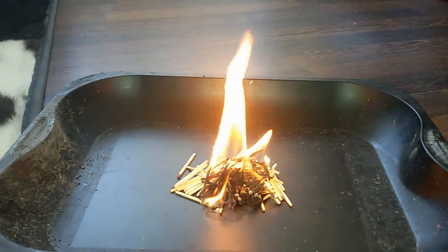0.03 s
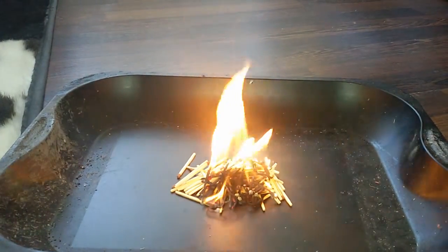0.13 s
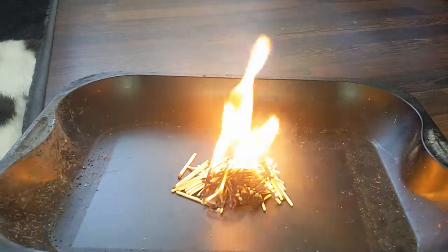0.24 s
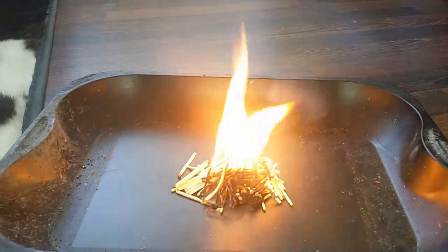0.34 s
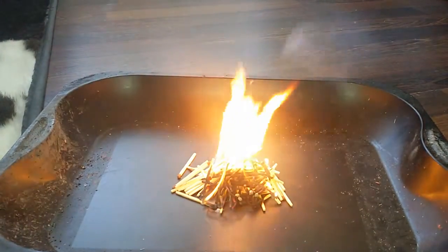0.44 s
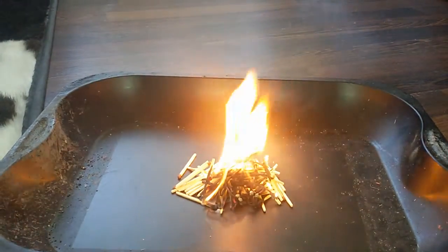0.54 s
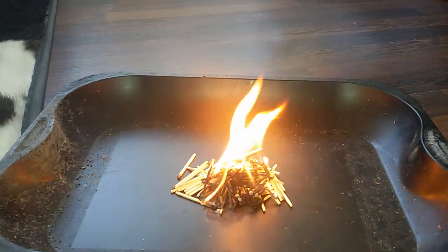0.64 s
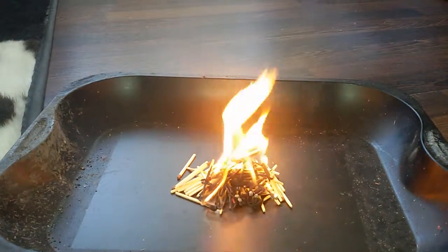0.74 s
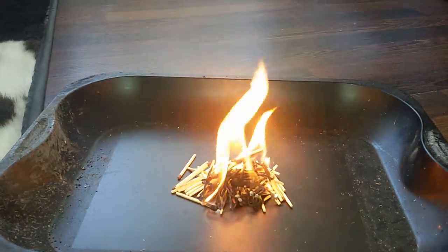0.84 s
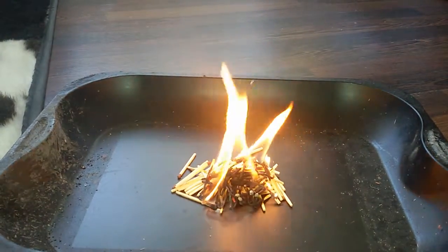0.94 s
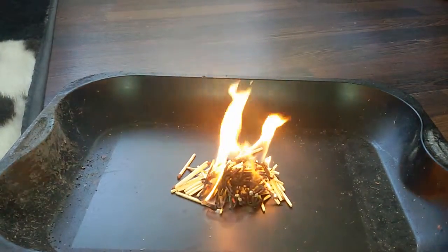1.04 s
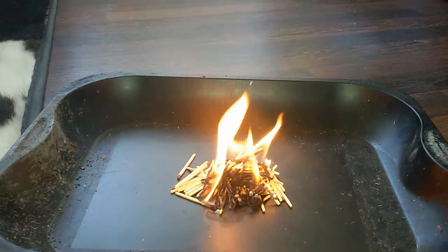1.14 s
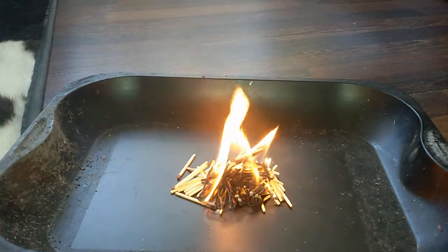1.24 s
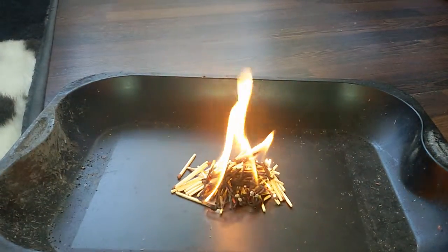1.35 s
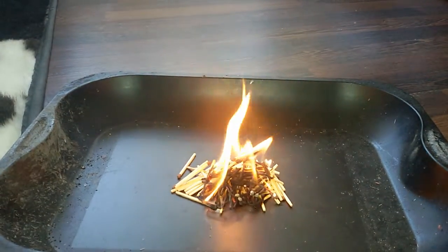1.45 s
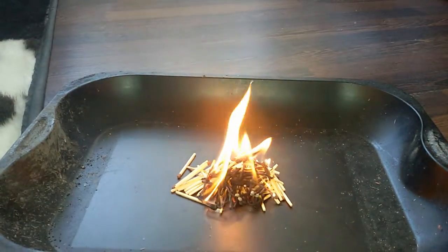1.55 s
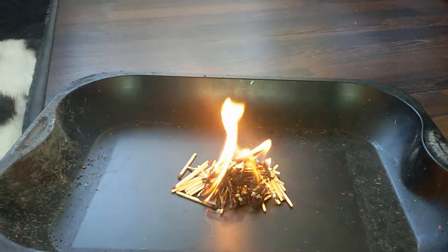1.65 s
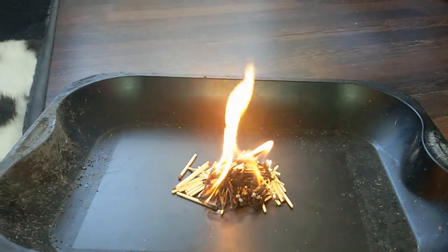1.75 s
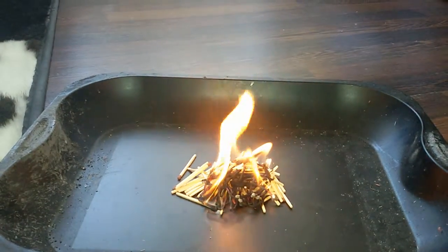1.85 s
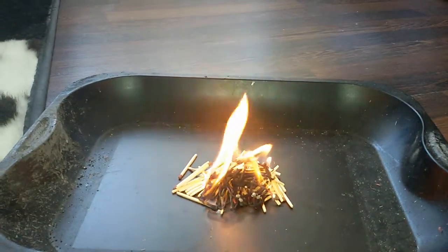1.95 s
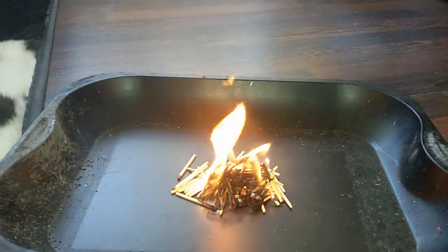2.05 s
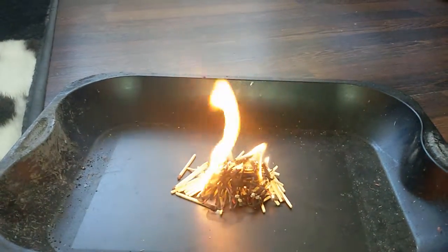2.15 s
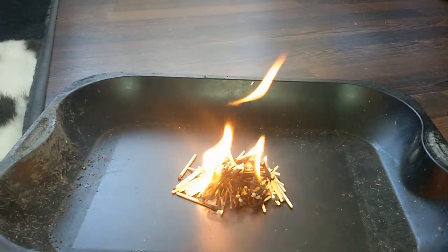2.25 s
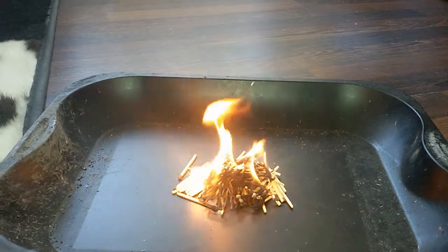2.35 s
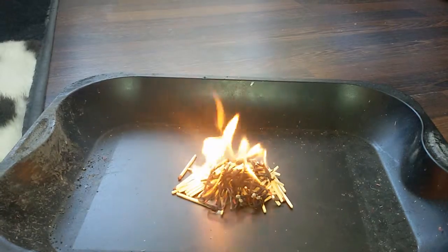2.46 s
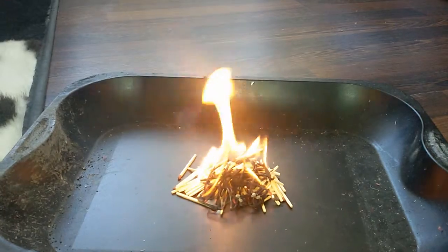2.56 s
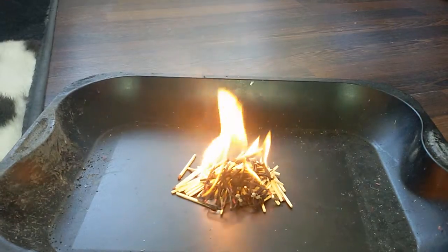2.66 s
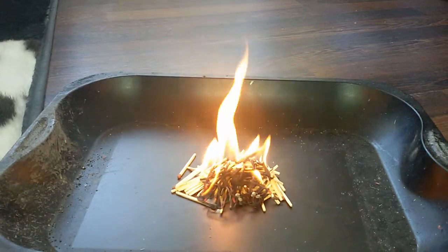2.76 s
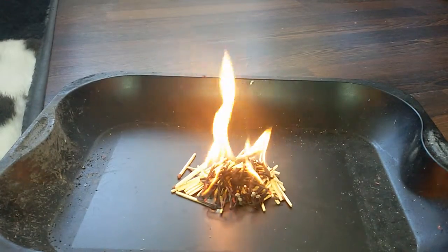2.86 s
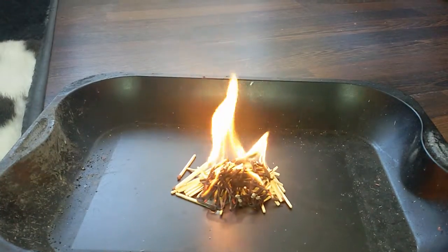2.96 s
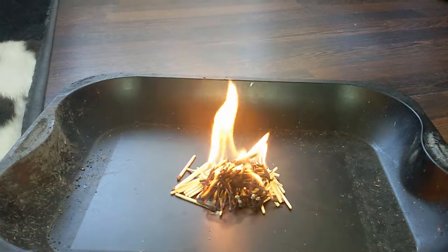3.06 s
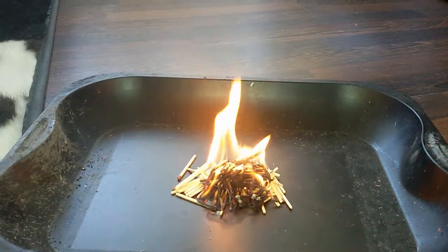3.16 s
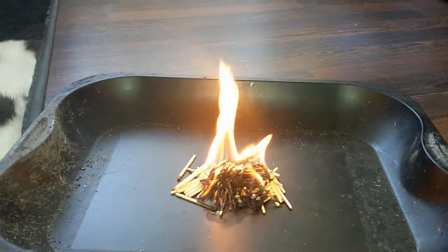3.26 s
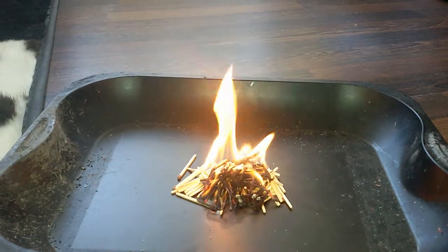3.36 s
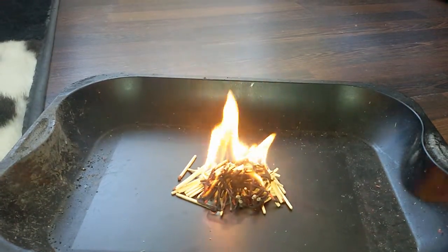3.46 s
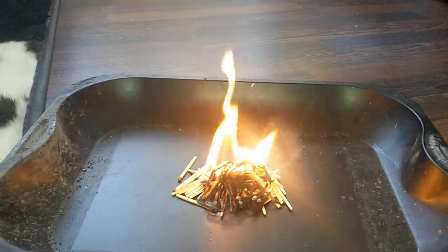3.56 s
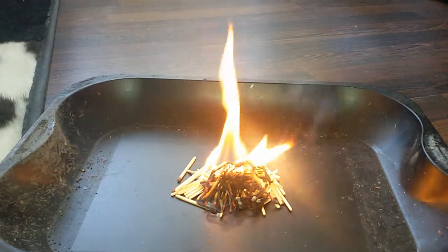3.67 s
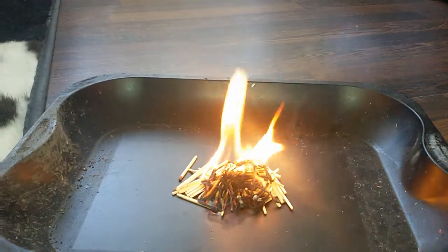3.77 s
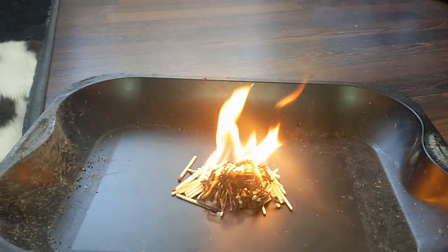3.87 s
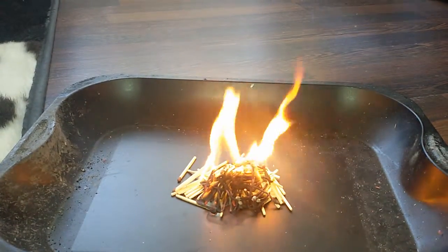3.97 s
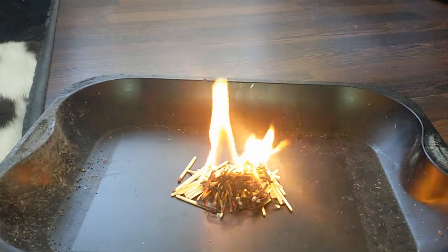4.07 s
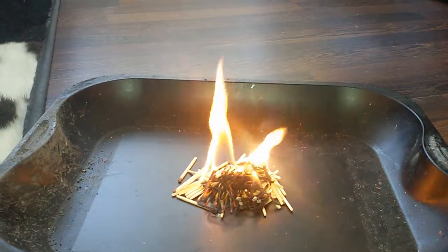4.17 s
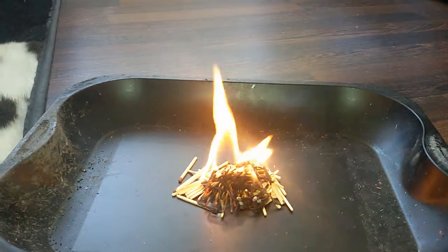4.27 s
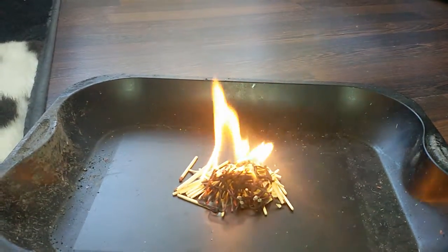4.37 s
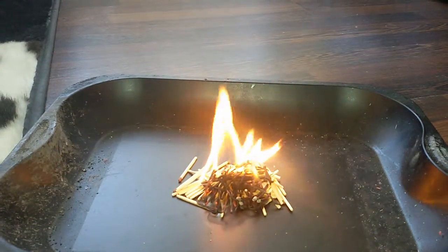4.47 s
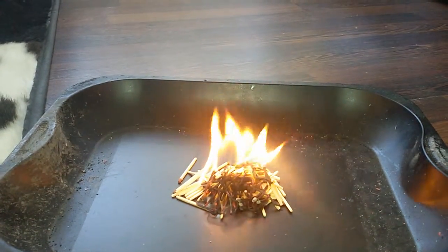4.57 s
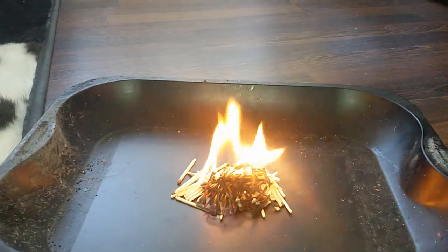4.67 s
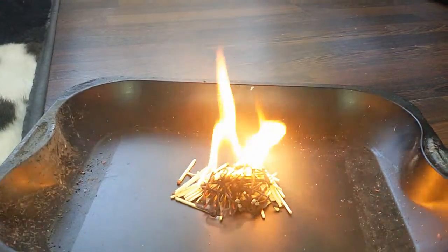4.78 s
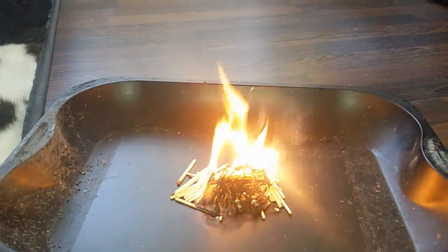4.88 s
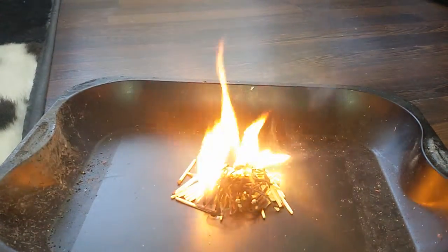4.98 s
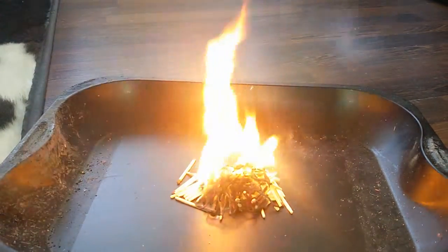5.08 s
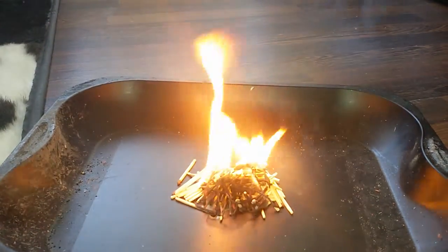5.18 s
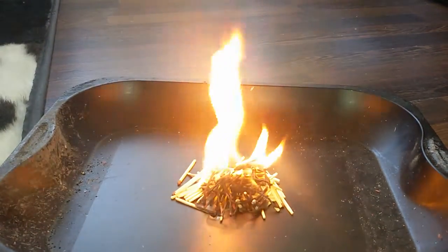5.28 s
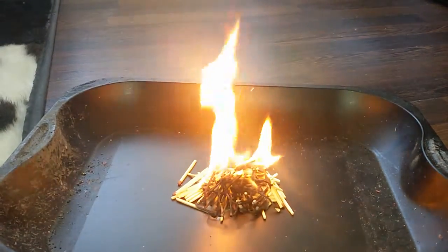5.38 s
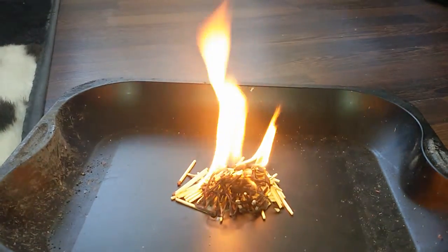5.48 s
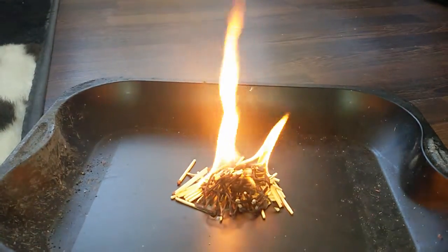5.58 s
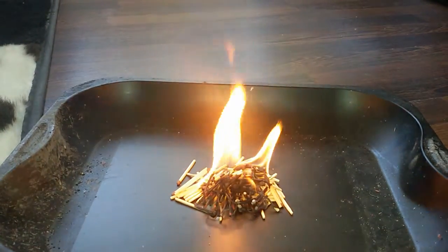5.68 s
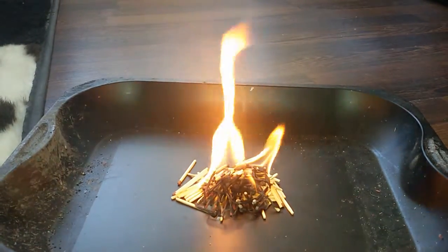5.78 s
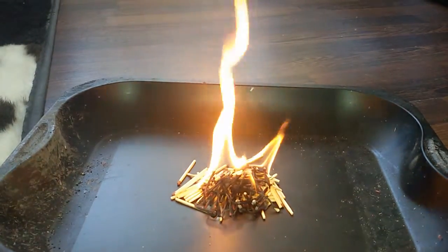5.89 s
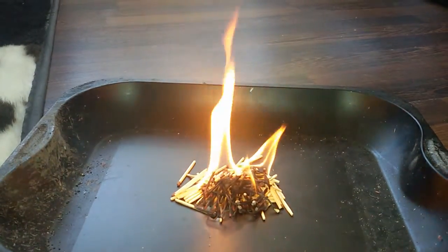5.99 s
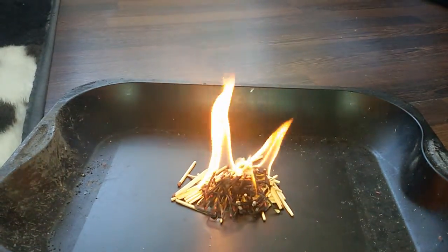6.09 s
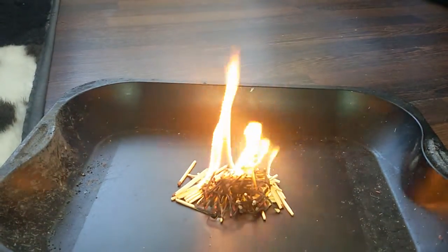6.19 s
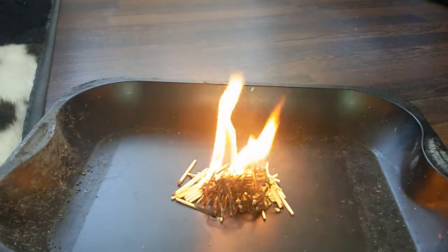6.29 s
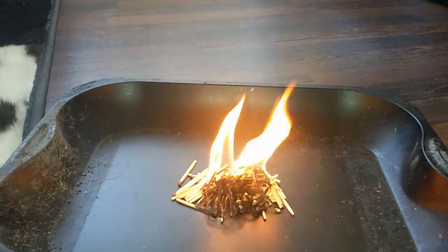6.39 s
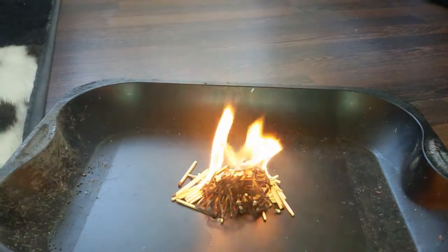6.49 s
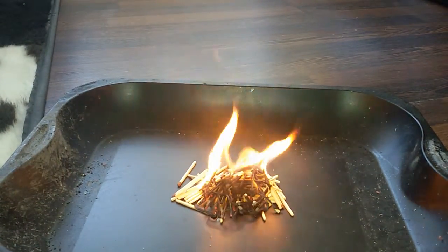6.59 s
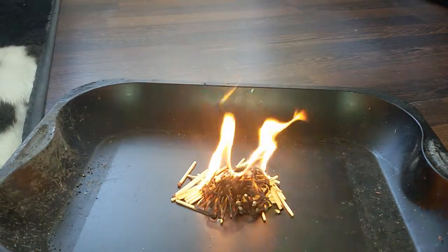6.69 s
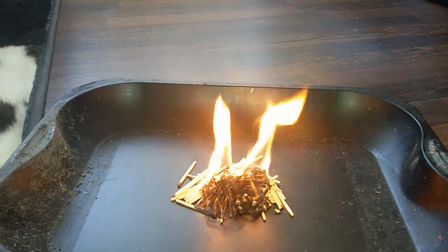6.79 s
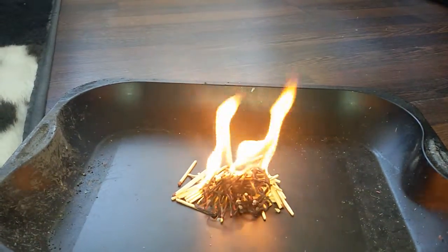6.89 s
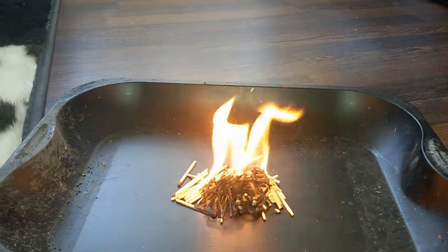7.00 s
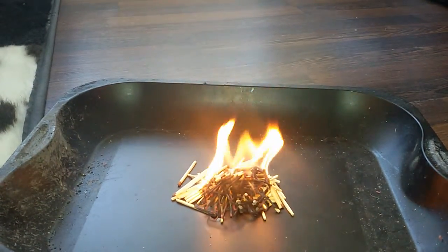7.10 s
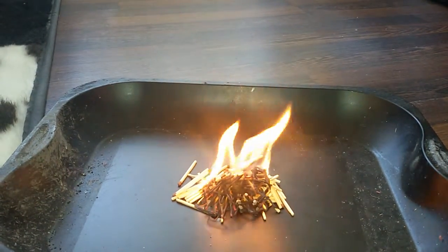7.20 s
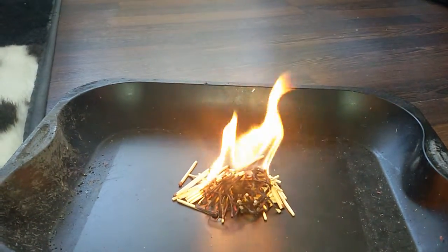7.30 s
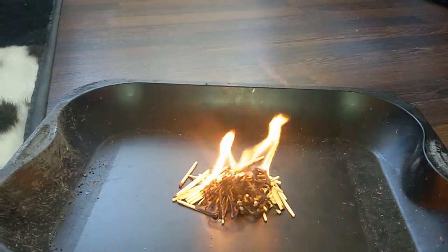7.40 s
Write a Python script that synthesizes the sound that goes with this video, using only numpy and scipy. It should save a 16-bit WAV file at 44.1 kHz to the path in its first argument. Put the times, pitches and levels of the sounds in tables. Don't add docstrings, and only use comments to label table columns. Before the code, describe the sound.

A heap of wooden matches burns in a metal tray, heads flaring in short hissing, crackling bursts with sharp pops between quieter gaps.

```python
import sys
import numpy as np
from scipy import signal
from scipy.fft import rfft, irfft, next_fast_len
from scipy.io import wavfile
from scipy.ndimage import uniform_filter1d, minimum_filter1d, map_coordinates

SR = 44100
rng = np.random.default_rng(int(sys.argv[2]) if len(sys.argv) > 2 else 0)


def transcribe(signal):
    frames = np.atleast_2d(signal).T
    limited = np.clip(frames, -1, 1)
    pcm = np.round(limited * 32767).astype(np.int16)
    wavfile.write(sys.argv[1], SR, pcm)


def magnitude_from_level(level_db):
    exponent = np.asarray(level_db, float) / 20
    return 10 ** exponent


N = 328448


def unit(x):
    return x / np.sqrt(np.mean(x ** 2) + 1e-20)


def along(points, hz):
    f, v = np.transpose(points)
    return np.interp(np.log(hz + 1), np.log(f + 1), v)


def wobble(rate):
    knots = rng.standard_normal(int(N * rate / SR) + 4)
    return map_coordinates(knots, [np.arange(N) * rate / SR])


def filtered(x, response):
    m = next_fast_len(N + SR // 2)
    return irfft(rfft(x, m) * response(np.fft.rfftfreq(m, 1 / SR)), m)[..., :N]


def noise(spectrum):
    return unit(filtered(rng.standard_normal(N), lambda hz: magnitude_from_level(along(spectrum, hz))))


def through(x, modes):
    def shape(f):
        total = 0
        for k, (center, width, db) in enumerate(modes):
            ring = 1j * f * width / (center * center - f * f + 1j * f * width)
            total = total + (-1) ** k * magnitude_from_level(db) * ring
        return total

    gain = np.sqrt(np.mean(np.abs(shape(np.linspace(0, SR / 2, num=2000))) ** 2))
    return filtered(x, shape) / gain


def bursts(rows):
    out, t = np.zeros(N + 2000), np.arange(2000) / SR
    puffs = rng.standard_normal((len(rows), len(t)))
    for (s, db, t60), puff in zip(rows, puffs):
        puff = puff * magnitude_from_level(-60 * t / max(t60, 3e-4))
        puff[0] = 4
        out[round(s * SR):][:len(t)] += magnitude_from_level(db) * puff / np.linalg.norm(puff[:50])
    return out[:N]


def jet(per_second, spread_db, gas, puff_db):
    chance, size, sign = rng.random((3, N))
    grains = (chance < per_second / SR) * magnitude_from_level(spread_db * size ** 3) * np.sign(sign - 0.5)
    puffing = magnitude_from_level(puff_db * np.tanh(0.65 * wobble(110) + 0.5 * wobble(30)))
    return unit(puffing * (unit(grains) + gas * rng.standard_normal(N)))


def room_tone():
    # f/Hz, level/dB per Hz
    quiet = [(12, -43), (20, -3), (103, -1.5), (164, -1.5), (199, -0.5), (421, -12.5), (497, -6.5),
             (818, -11.5), (940, -11), (1080, -13), (1730, -11), (1930, -9.5), (3360, -13.5),
             (13800, -23.5), (15000, -30.5)]
    # f/Hz, level/dB
    appliance = [(102.3, -87), (861.3, -79.5), (931.3, -77), (1147, -80.5), (1863, -80.5)]
    t = np.arange(N) / SR
    hum = np.zeros(N)
    for hz, db in appliance:
        hum += magnitude_from_level(db + 4 + wobble(3)) * np.sin(2 * np.pi * hz * t + wobble(3))
    nears_db = 110 * (t - 2.06)
    leaves_db = 17 * (2.24 - t)
    pass_db = -63.5 + np.minimum(0, np.minimum(nears_db, leaves_db))
    drone = magnitude_from_level(pass_db + 3.2 * wobble(12)) * np.sin(2 * np.pi * 66 * t + 0.8 * wobble(10))
    hiss = magnitude_from_level(-61.5 + 0.05 * wobble(1.0)) * noise(quiet)
    return hiss + hum + drone


def burning():
    # t/s, burn length/s, hiss level/dB, height in the heap (0-1), sizzle level/dB over the hiss
    hollow_heads = [(0.229, 0.28, -41, 0.45, -10), (0.474, 0.1, -41, 0.6, -7.5),
                    (0.653, 0.13, -45, 0.42, -5.5), (0.847, 0.087, -57, 1, 5),
                    (3.546, 0.13, -41.5, 0.5, -12), (3.662, 0.044, -40, .3, -9.5),
                    (3.745, 0.045, -45, 0.15, -8), (3.86, 0.063, -52, 0.4, -1.5),
                    (4.057, 0.055, -55, 0.5, -6), (4.112, 0.093, -51, 0.4, -7.5),
                    (4.231, 0.24, -51.5, 0, -7.5), (4.723, 0.11, -53.5, 0.4, -3.5),
                    (4.79, 0.16, -42.5, 0.43, -11), (5.126, 0.11, -44.5, 0.74, -3.5)]
    packed_heads = [(2.143, 0.17, -61.5, 0.93, -9), (2.33, 0.059, -51, 0.9, -8),
                    (2.417, 0.25, -52, 0.77, -8), (2.68, 0.09, -54, 0.76, -2), (4.928, 0.13, -38, 0.83, -4),
                    (5.343, 0.13, -52, 0.67, -7), (5.495, 0.23, -46, 0.72, -7.5),
                    (6.19, 0.028, -40, 0.54, -7.5), (6.268, 0.11, -39.5, 0.59, -7),
                    (6.383, 0.16, -41, 0.56, -3), (6.723, 0.28, -61, .4, -5), (6.904, 0.14, -45, 0.2, -6.5),
                    (7.067, 0.19, -48.5, 0.28, -4.5), (7.29, 0.12, -54.5, 0.4, -19)]
    catch_s, sag_db_per_s, die_db_per_s = 0.03, 4.5, 131
    glow_db, glow_db_per_s = -19, 23.5
    smoulder_db = -73.5
    s, length, db, height, sizzle_db = np.transpose(hollow_heads + packed_heads)[:, :, None]
    clock = np.arange(0, N / SR + 0.01, 0.002)
    age = clock - s
    after = np.maximum(age - length, 0)
    glow = np.minimum(glow_db - glow_db_per_s * after, 0)
    fade = np.maximum(-die_db_per_s * after, glow)
    rise = 1 - np.exp(-np.maximum(age, 0) / catch_s)
    flare = magnitude_from_level(db - sag_db_per_s * np.clip(age, 0, length) + fade) * rise
    power = flare ** 2 + magnitude_from_level(smoulder_db) ** 2 / len(s)
    total = power.sum(axis=0)
    slow = [10 * np.log10(total),
            (power * height).sum(axis=0) / total,
            (power * sizzle_db).sum(axis=0) / total,
            power[:len(hollow_heads)].sum(axis=0) / total]
    return [np.interp(np.arange(N) / SR, clock, curve) for curve in slow]


def flame():
    # f/Hz, level/dB per Hz
    flutter = [(24, -43), (40, -8), (135, 0), (251, -1.5), (334, -1.5), (383, -3.5), (735, -4),
               (1010, -8.5), (1500, -6), (1950, -28), (3300, -120)]
    lag = np.exp(-1 / (0.02 * SR))
    heat = signal.lfilter([1 - lag], [1, -lag], magnitude_from_level(burning()[0]))
    heat_db = 20 * np.log10(heat + 1e-9)
    level_db = -51.5 + 0.6 * (heat_db + 45)
    lumps = magnitude_from_level(1.46 * wobble(40) + 1.3 * wobble(9))
    return magnitude_from_level(level_db - 2.0) * unit(lumps * noise(flutter))


def pops():
    # t/s, level/dB
    snaps = [(0.4493, -29), (0.7, -26), (0.818, -22.5), (0.8755, -27.5), (2.2589, -41), (2.6178, -28),
             (2.6982, -25.5), (2.7306, -21.5), (3.5601, -27), (3.7045, -26), (3.7697, -17.5), (3.7846, -23),
             (3.9116, -24.5), (3.935, -22), (4.3351, -26), (4.3921, -23), (4.422, -19.5), (4.453, -22),
             (4.4593, -20.5), (4.9477, -18), (5.0156, -18), (5.0486, -23), (5.2246, -21.5), (5.2327, -27),
             (5.4407, -26.5), (5.6872, -22), (5.7004, -25.5), (6.2835, -25), (6.4639, -17.5), (6.7493, -26),
             (6.91, -23.5),
        (6.932, -36),
        (6.945, -24),
        (7.041, -29),
        (7.1861, -18.5),
        (7.22, -22),
        (7.2501, -23),
        (7.279, -28),
        (7.3323, -23),
        (7.3795, -33.5),
    ]
    # t/s, level/dB
    cracks = [(0.535, -17.5), (0.7377, -27), (0.7745, -24.5), (0.8924, -31), (0.9334, -21), (0.946, -32),
              (1.1584, -42.5), (2.2739, -33), (2.35, -28), (2.535, -36), (2.7634, -19), (3.6736, -22),
              (3.6922, -30), (4.98, -20), (4.9983, -44), (5.0802, -35), (5.102, -25), (5.1109, -31),
              (5.261, -18.5), (5.5357, -29), (5.7487, -28), (5.7657, -22), (5.7868, -22.5), (6.2485, -25),
              (6.2767, -15.5), (6.458, -23), (6.5004, -20), (6.517, -17), (6.5366, -22.5),
              (0.506, -33), (0.6608, -31.5), (0.9572, -33), (1.278, -48), (2.2052, -39), (2.3444, -37),
             (2.5075, -36), (2.5734, -35), (2.742, -28.5), (3.5904, -27), (3.776, -27), (4.171, -31),
             (4.8238, -32), (4.85, -36), (5.063, -33), (5.527, -33), (5.577, -36), (6.436, -21)]
    # t/s, level/dB, puff t60/s
    puffs = [(0.236, -34, 0.01), (0.3395, -25.5, 0.023), (0.3903, -28, 0.09), (0.5284, -26.5, 0.0093),
             (0.61, -28.5, .012), (0.7844, -32, 0.035), (3.605, -26.5, 0.011), (4.8142, -31, 0.0095),
             (4.8696, -34, 0.0089), (4.9227, -29, .018), (4.989, -16.5, 0.007), (5.025, -17, 0.012),
             (5.1407, -12.5, 0.046), (5.1744, -20.5, 0.015), (5.3981, -24.5, 0.015), (5.4555, -28.5, .02),
             (5.5023, -30, .018), (6.319, -23.5, 0.038), (6.36, -25, .016), (6.41, -22, .007),
             (6.4297, -21.5, 0.025), (6.4738, -19, 0.016), (6.549, -35, .02), (6.591, -27.5, 0.022),
             (7.1545, -30, 0.0074), (7.233, -26, 0.024)]
    dull = [(*row, 0.002) for row in snaps]
    bright = [(*row, 0.0018) for row in cracks]
    early = [-3e-4, 0, 0]
    kinds = [bursts(np.add(rows, early)) for rows in (dull, bright, puffs)]
    return np.array(kinds) * magnitude_from_level([[6], [7], [6.5]])


def spits():
    # t/s, level/dB
    spit_events = [(0.9333, -24), (1.1555, -42), (4.7533, -37), (4.9701, -27), (5.1008, -40),
                   (5.1392, -18.5), (5.3974, -33), (5.7887, -28), (6.4098, -23.5), (6.433, -23.5),
                   (6.459, -47), (6.4733, -13.5), (6.5266, -21), (6.547, -24), (6.8633, -41)]
    return bursts([(*row, 0.0065) for row in spit_events]) * magnitude_from_level(-1.5)


def heads():
    floor_modes = [(617, 300, -13.5), (1633, 92, -2), (1937, 167, 2), (2226, 460, -4)]
    wall_modes = [(3155, 264, 7), (3490, 524, 5)]
    rim_modes = [(4550, 910, -1), (5700, 250, 2.5), (6200, 390, 2.5), (8000, 700, -5), (8800, 200, -3.5)]
    open_modes = [(2520, 1850, -1.5), (4540, 1800, 0.5)]
    port_modes = [(9180, 5300, -8), (11650, 970, -3), (13050, 590, -5), (14340, 630, -3.5)]
    hollow_modes = [(2420, 440, 0)]
    clear_db = 7

    hiss_db, height, sizzle_db, hollow = burning()
    height = np.clip(height, 0, 1)
    wall_db = -13.5 + 11 * height ** 1.16
    open_db = -15.5 + 14.5 * height ** 1.6
    steam_db = -59 + 0.47 * (hiss_db + 45) + 0.68 * (sizzle_db + 7)

    gas = jet(per_second=1200, spread_db=16, gas=0.99, puff_db=2.5) * magnitude_from_level(hiss_db - 4.0)
    crackle = jet(per_second=900, spread_db=14, gas=1.0, puff_db=5.5) * magnitude_from_level(hiss_db + 2.5)
    steam = jet(per_second=2600, spread_db=9, gas=9.0, puff_db=2.5) * magnitude_from_level(steam_db - 4)
    popping, spit = pops(), spits()
    pop_sizzle_db = np.array([-23, -8.5, -9.5])
    blunt = uniform_filter1d(popping.sum(axis=0), size=4)
    push = gas + blunt * magnitude_from_level(-clear_db * height ** 2)

    low = through(push, floor_modes) - through(push * hollow * magnitude_from_level(-7.5), hollow_modes)
    wall = through(push * magnitude_from_level(wall_db), wall_modes)
    direct = through((crackle - blunt * magnitude_from_level(clear_db * height)) * magnitude_from_level(open_db), open_modes)
    sizzle = gas * magnitude_from_level(sizzle_db - 2.5) + magnitude_from_level(pop_sizzle_db - 1.5) @ popping
    mid = through(sizzle + spit * magnitude_from_level(4.5), rim_modes)
    top = through(steam + magnitude_from_level(2.0 * pop_sizzle_db - 10.5) @ popping + spit, port_modes)
    return low - wall - mid + top + direct


def thuds():
    # t/s, level/dB, f/Hz, knock share
    drops = [
        (3.2177, -35, 129, .2),
        (3.3076, -38.5, 132, 0.31),
        (5.129, -30, 294, 0.78),
        (5.44, -24.5, 178, 0.89),
        (5.5012, -28, 200, 0.3),
    ]
    out, t = np.zeros(N + 2000), np.arange(2000) / SR
    for s, db, hz, share in drops:
        slowing = t - 0.00037 * np.exp(-t / 0.00083)
        push = np.sin(2 * np.pi * hz * slowing) * magnitude_from_level(-60 * t / 0.018)
        knock = -share * np.sin(2 * np.pi * 620 * t) * magnitude_from_level(-60 * t / 0.012)
        soft_start = 1 - np.exp(-t / 0.0013)
        out[round(s * SR):][:len(t)] += magnitude_from_level(db) * (push + knock) * soft_start
    return out[:N]


def room(x):
    # f/Hz, t60/s
    decay = [(300, 1), (2000, 0.19), (6000, 1), (12000, 1)]
    hz, t, z = signal.stft(rng.standard_normal(SR // 2), SR, nperseg=256)
    tail = signal.istft(z * magnitude_from_level(-60 * t / along(decay, hz)[:, None]), SR, nperseg=256)[1]
    return signal.fftconvolve(np.pad(x, (300, 0)), tail / np.linalg.norm(tail))[:N]


def scene():
    tone = room_tone()
    fire = heads() + thuds()
    mono = fire + magnitude_from_level(-13) * room(fire) + flame() + tone
    return np.array([mono, mono])


def starved(x, from_hz, step_db, rest_db, uneven_db):
    hz, _, z = signal.stft(x, SR, window="cosine", nperseg=2048)
    middle = z[(hz > 1500) & (hz < 4000)]
    loud = np.sqrt(np.mean(np.abs(middle) ** 2, axis=0))
    loud = minimum_filter1d(loud, size=2)
    bands = rng.standard_normal((len(hz) // 32 + 1, z.shape[1]))
    bands = bands.repeat(32, axis=0)[:len(hz)]
    step = (magnitude_from_level(step_db) * loud + magnitude_from_level(rest_db)) * magnitude_from_level(uneven_db * bands)
    step = step / (1 + (from_hz / (hz[:, None] + 1)) ** 6)
    return signal.istft(np.round(z / step) * step, SR, window="cosine", nperseg=2048)[1][:N]


def low_pass(x):
    return signal.sosfilt(signal.butter(12, 15900, fs=SR, output="sos"), x)


def record(dry):
    def band(hz):
        treble_edge = 1 / np.sqrt(1 + (hz / 14580) ** 500)
        bass_edge = 1 / np.sqrt(1 + (36 / (hz + 1)) ** 6)
        return treble_edge * bass_edge

    x = starved(dry[0], from_hz=7500, step_db=-15, rest_db=-98, uneven_db=2.5)
    x = filtered(x, band) - 3e-4
    return low_pass(np.array([x, x]))


dry = scene()
out = record(dry)
transcribe(out)
```